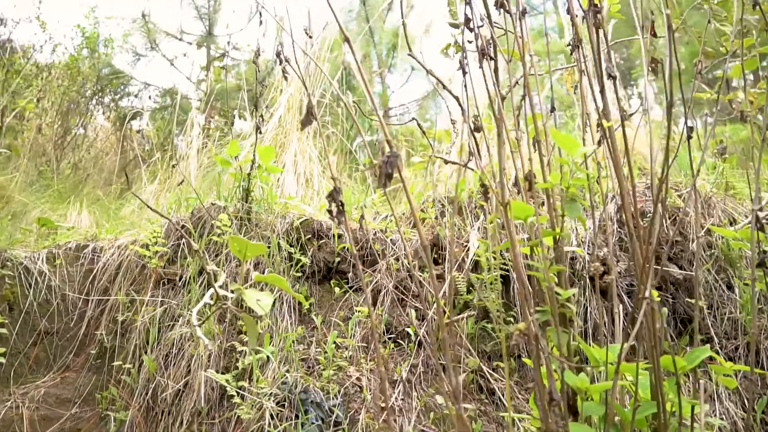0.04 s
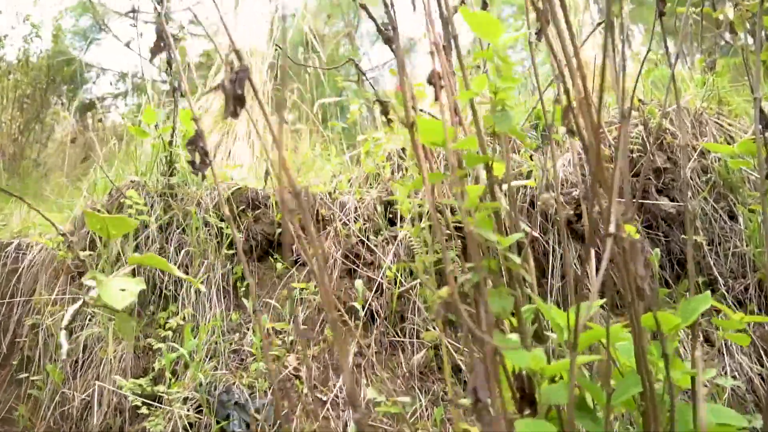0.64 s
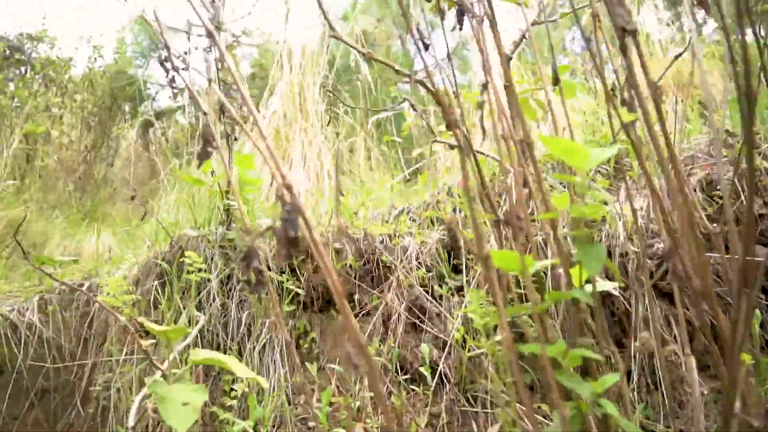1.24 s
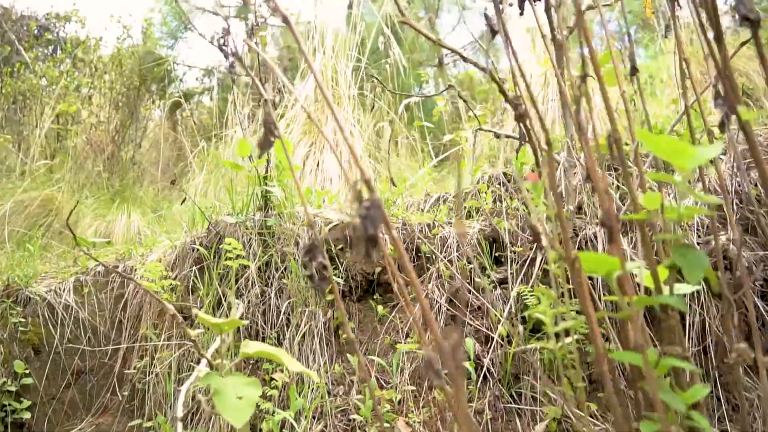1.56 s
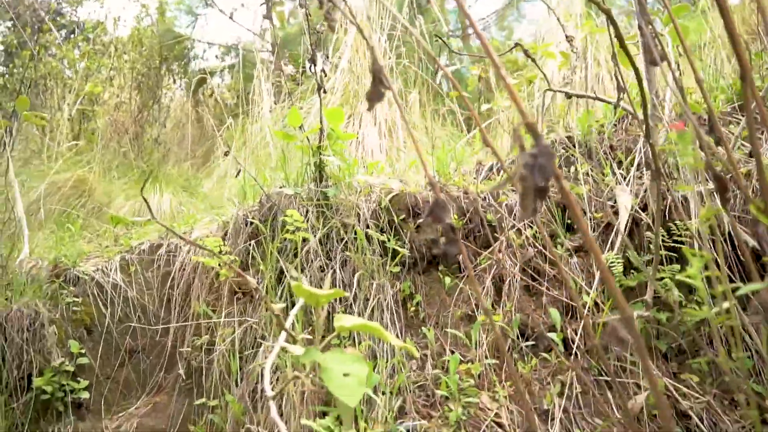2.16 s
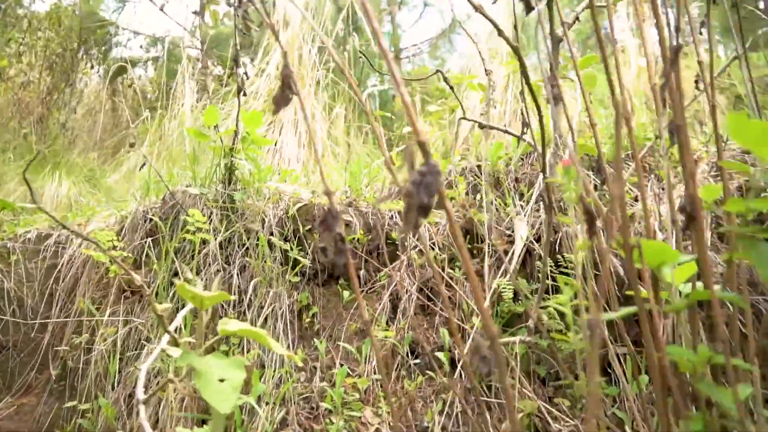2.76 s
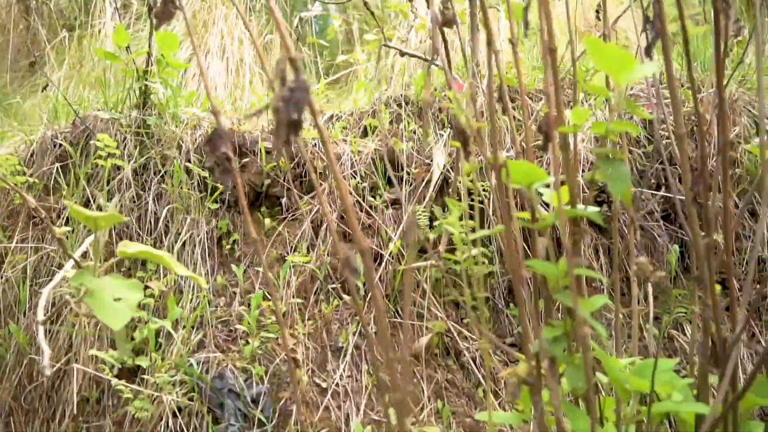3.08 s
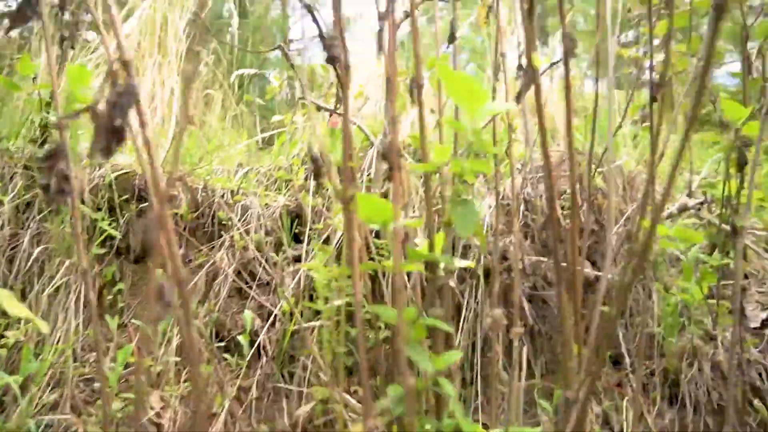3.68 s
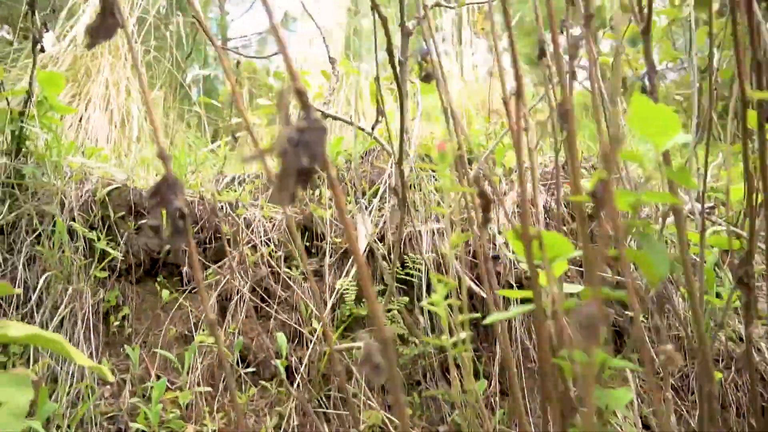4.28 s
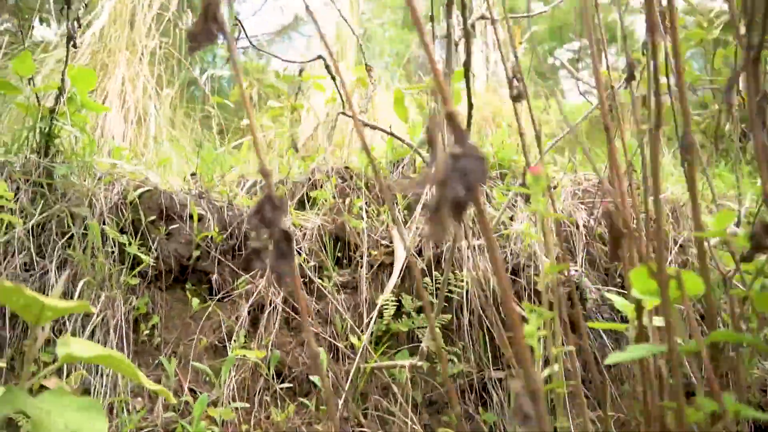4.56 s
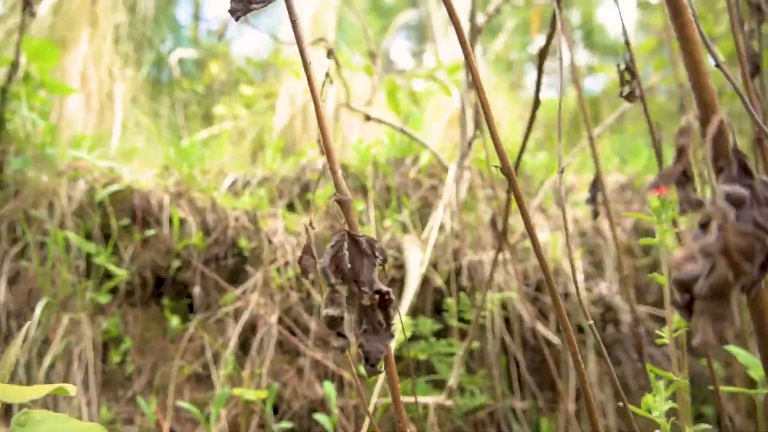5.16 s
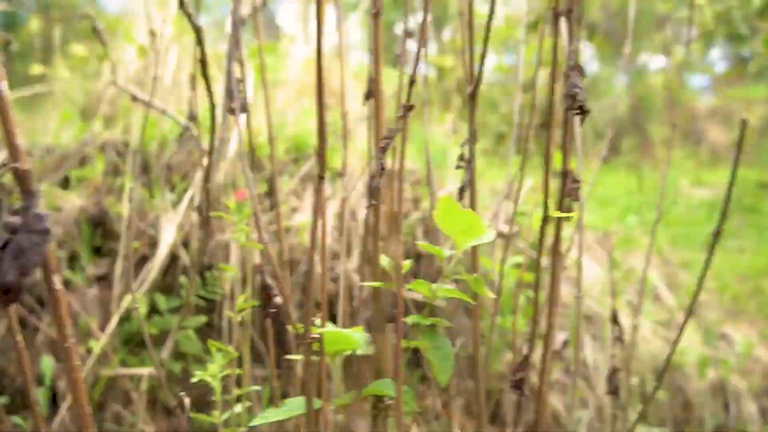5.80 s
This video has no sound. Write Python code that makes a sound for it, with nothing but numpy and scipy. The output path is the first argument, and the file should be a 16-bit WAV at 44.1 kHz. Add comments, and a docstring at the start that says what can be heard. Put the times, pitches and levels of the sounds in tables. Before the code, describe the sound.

Short rasps and harsh falling screeches from a scolding bird, with low microphone rumble and faint handling noise behind.

```python
"""Scolding bird on a wooded bank

Six harsh screeches clear and then fall, each led by one or two short rasps; one pair of rasps stands
alone. The two sides of the syrinx beat roughly at clashing pitches, coloured by the open beak; trunks
and leaves answer briefly. Behind it, air rumbles on a slow-moving microphone, a hand rubs and bumps
the camera, dry stalks tick, leaves rustle, two dull knocks sound and faint whistles come from far off."""
import sys
import numpy as np
from scipy import signal
from scipy.fft import rfft, irfft, next_fast_len
from scipy.io import wavfile
from scipy.ndimage import uniform_filter1d, map_coordinates

SR = 44100
rng = np.random.default_rng(int(sys.argv[2]) if len(sys.argv) > 2 else 0)


def store_pcm(level_fs):
    """Save levels as 16-bit WAV."""
    pcm = np.round(np.clip(level_fs, -1, 1) * 32767).astype(np.int16)
    wavfile.write(sys.argv[1], SR, np.atleast_2d(pcm).T)


N = 266011
TIME = np.arange(N) / SR

# Tone of the still wood, the air's slow sway, its faster buffet and the hand's rub: f/Hz, gain/dB
HUSH_EQ = [(150, -78), (250, -2.5), (324, -0.5), (658, -3), (930, -8), (1800, -11.5), (2100, -13),
           (3840, -15.5), (5240, -14), (6230, -15.5), (15600, -23)]
SWAY_EQ = [(3, -18.5), (6, -9), (11, 0), (16, 2.5), (22, -13.5), (30, -50), (60, -78), (120, -120)]
BUFFET_EQ = [(15, -16.5), (26, -1), (38, 0), (48, -11.5), (60, -16), (80, -28), (120, -12.5), (300, -60),
             (1000, -120)]
RUB_EQ = [(40, -24), (90, -2), (130, -1), (180, -3), (240, -10), (330, -11.5), (600, -23), (1200, -27.5),
          (3000, -63), (10000, -72)]
# Fader moves for the air on the microphone: t/s, sway/dB, buffet/dB
AIR_FADES = [(0.0, -21, -24.5), (0.28, -19, -41.5), (0.43, -14.5, -28), (0.5, -12.5, -36),
             (0.78, -26, -31.5), (1.03, -17, -38), (1.27, -25, -33.5), (1.5, -16.5, -42.5),
             (1.85, -29, -40), (2.07, -15, -32), (2.42, -14, -34), (2.52, -19.5, -27), (2.62, -6.5, -28),
             (2.69, -20, -37.5), (2.86, -14, -20.5), (3.14, -9, -36), (3.21, -26, -33), (3.44, -10.5, -37),
             (3.48, -20, -36.5), (4.16, -16.5, -38.5), (4.28, -38.5, -43.5), (4.33, -22.5, -41),
             (4.93, -8.5, -31), (5.1, -20.5, -40), (5.23, -8, -29), (5.33, -21.5, -43),
             (5.68, -21.5, -40.5), (5.75, -19, -25.5), (5.93, -23, -42), (6.0, -14, -29)]
# Fader moves for the rubbing hand: t/s, level/dB
RUB_FADES = [(0, -53.5), (.6, -60), (1.9, -62), (2.15, -53.5), (2.7, -56), (2.95, -48), (3.4, -59),
             (4.5, -61.5), (4.8, -55), (5.4, -60.5), (6, -55.5)]
# Soft bumps as the grip shifts: t/s, width/s, level/dB
GRIP_BUMPS = [(0.042, 0.0086, -40), (0.281, 0.031, -45.5), (1.142, 0.0078, -47.5), (1.251, 0.0063, -49),
              (2.075, 0.026, -49), (2.23, .01, -51.5), (2.337, 0.017, -45), (2.483, 0.0073, -46),
              (2.6, .01, -43.5), (2.834, 0.0085, -40.5), (2.917, 0.027, -42.5), (3.12, 0.014, -50),
              (3.554, .012, -53.5), (4.743, .01, -53), (4.82, 0.018, -41), (5.766, 0.011, -61)]
# Distant whistles: t/s, width/s, f/Hz, level/dB
FAR_WHISTLES = [(.02, 0.05784, 3324, -70), (3.024, 0.004, 1233, -61), (3.083, 0.0094, 2257, -64),
                (3.633, 0.034, 3319, -63), (3.76, 0.097, 3288, -73.5), (3.856, 0.012, 1305, -69),
                (5.919, 0.18, 1801, -74)]
# Leaf rustles and two short dull knocks: t/s, width/s, level/dB, centre f/Hz
RUSTLES_AND_KNOCKS = [(0.04, 0.0084, -57, 3180), (0.445, 0.065, -65, 5500), (0.65, 0.013, -64, 4850),
                      (2.19, 0.034, -60, 7552), (2.238, 0.012, -58.5, 8500), (2.326, 0.052, -63, 7740),
                      (2.343, 0.0016, -48, 696), (4.837, 0.025, -60.5, 1310), (4.831, 0.026, -60.5, 5000),
                      (4.903, 0.0029, -51, 1002)]
# Snapping stalks: t/s, relative level/dB, ring f/Hz, crack against ring/dB
STALK_SNAPS = [(0.2471, -46, 3280, -15), (0.3078, -46, 2950, -10), (0.335, -42.5, 2600, 3.5),
               (2.8841, -42.5, 2530, -10), (3.5463, -31, 3092, -19), (3.5612, -44, 2556, -7),
               (3.5965, -36, 2930, -14), (4.7099, -48, 2560, 5.5), (5.6956, -47, 2875, -15)]
# Reverb time among the trees: f/Hz, t60/s
WOOD_DECAY = [(300, 0.3), (5500, 0.47), (9000, 0.2088), (15000, 0.12)]
# Resonances of windpipe and beak (broad body, piercing throat, upper peak, sizzle): f/Hz, gain/dB
BODY_EQ = [(400, -31), (750, -14.5), (1080, 0), (1400, -7), (1950, -2.5), (2900, 1), (3900, 0),
           (5500, -0.5), (9000, -17), (12000, -52)]
THROAT_EQ = [(1000, -40), (2400, -19), (3200, -9.5), (4000, -3.5), (4550, 1.5), (5050, 5.5), (5600, 2),
             (6150, -10.5), (7300, -38), (9000, -31), (12000, -60)]
UPPER_EQ = [(1200, -24), (3300, -44), (5200, -6), (6200, -2.5), (7100, 3.5), (7900, -1), (8400, -6.5),
            (8900, -18.5), (9800, -27), (12000, -38)]
SIZZLE_EQ = [(6000, -12), (9000, 5), (10000, 2.5), (11500, -0.5), (13800, 3), (15500, -3), (18000, 4.5)]
# Short rasps: peak t/s, rise/s, level/dB, upper send/dB, sizzle send/dB, throat f/Hz, upper f/Hz
RASP_CUES = [(.813, 0.061, -37.5, -1.5, -22, 5070, 7300), (1.542, .019, -38.5, -1, -19.5, 4600, 6870),
             (2.414, .012, -35, -20, -30, 4606, 6803), (2.489, 0.022, -33, -13.5, -25, 4900, 7100),
             (3.147, .02, -39.5, -8, -18.5, 5058, 6670), (3.226, 0.048, -35.5, -2.5, -22, 5360, 7343),
             (3.945, .017, -37.5, -3.5, -25, 4740, 6000), (4.022, 0.04, -33.3, -1, -18, 5204, 6878),
             (4.421, .036, -43.5, -.7, -13, 4510, 7140), (4.499, .036, -38.5, -6, -20, 5200, 7030),
             (4.943, 0.024, -49.5, -12, -19, 4300, 6500), (5.017, 0.032, -44, -8, -21.5, 5430, 7263)]
# Long screeches: start t/s, end t/s, swell/s, swell depth/dB, fall/s, fall bend/exponent,
# level/dB, upper send/dB, sizzle send/dB, upper loss in the fall/dB,
# low side f/Hz, high side f/Hz, final low f/Hz, final high f/Hz, throat f/Hz, throat slide/share,
# upper f/Hz, time to clear/s, settled jitter/share, added jitter at the end/share
SCREECH_CUES = [(.874, 1.374, 0.0536, 4, 0.26, 1.63, -40.5, 1.2, -32, 5.5, 842, 920, 607.5, 661.3, 5030, 0.065, 7150, .07, 0.04, .25),
                (1.599, 1.883, 0.18, 2.5, 0.16, 1.2, -37.5, 1.5, -17, 9, 945.5, 1111, 608.8, 750, 4830, .01, 7370, .135, 0.02, .16),
                (2.536, 2.809, 0.11, 6.5, .14, 2.15, -34.5, -11, -27, 20, 936.8, 1052, 674.4, 681, 5020, 0.1, 7233, .12, 0.03, 0),
                (3.263, 3.494, 0.074, 7.5, .11, 1.34, -36, 1.5, -22.5, 21, 999.4, 1156, 744.6, 759.7, 5399, 0.033, 6680, 0.117, 0.03, 0),
                (4.065, 4.262, .025, 5.5, .1, 1.4, -37, -0.1, -17.5, 21, 938, 1104, 714.5, 810.5, 5130, 0.0067, 7115, 0.1149, 0.03, .1),
                (5.065, 5.229, 0.13, 10.5, 0.065, 1.76, -41.5, -8, -24, 21, 952, 1082, 818, 937, 5545, 0.27, 7640, 0.099, 0.04, 0.02)]


def amp(db):
    """Decibels to gain."""
    return 10 ** (np.asarray(db) / 20)


def unit(x):
    """Scale to rms 1."""
    return x / np.sqrt(np.mean(x ** 2) + 1e-20)


def along(points, hz):
    """Read (frequency, value) points on a log axis."""
    f, v = np.transpose(points)
    return np.interp(np.log(hz + 1), np.log(f + 1), v)


def curves(rows):
    """One automation curve for each column after the time."""
    times, *columns = np.transpose(rows)
    return [np.interp(TIME, times, column) for column in columns]


def filtered(x, response):
    """Equalise x with a gain given as a function of frequency."""
    size = next_fast_len(N + SR // 2)
    return irfft(rfft(x, size) * response(np.fft.rfftfreq(size, 1 / SR)), size)[:N]


def noise(eq):
    """Coloured noise of rms 1."""
    return unit(filtered(rng.standard_normal(N), lambda hz: amp(along(eq, hz))))


def wobble(rate):
    """Smooth random modulation, rate points a second."""
    return map_coordinates(rng.standard_normal(int(N * rate / SR) + 4), [TIME * rate])


def bell(s, width):
    """A bell-shaped fade in and out around the time s."""
    return np.exp(-.5 * ((TIME - s) / width) ** 2)


def hush(level_db=-61):
    """The bed: still woodland, gently drifting in level."""
    return amp(level_db + .7 * wobble(6)) * noise(HUSH_EQ)


def eddies(eq, level_db, cutoff_hz):
    """Low-passed rolls of air, evened out to a similar size."""
    air = noise(eq)
    rolls = unit(air / (np.abs(signal.hilbert(air)) + .5))
    return filtered(amp(level_db) * rolls, lambda hz: 1 / np.sqrt(1 + (hz / cutoff_hz) ** 10))


def air_rumble():
    """Air rolls over the microphone: a slow sway under a faster buffet."""
    sway_db, buffet_db = curves(AIR_FADES)
    return eddies(SWAY_EQ, sway_db + .52, cutoff_hz=25) + eddies(BUFFET_EQ, buffet_db + 1, cutoff_hz=80)


def handling():
    """The hand rubs unevenly on the camera body and bumps it as the grip shifts."""
    rub_db, = curves(RUB_FADES)
    rub = amp(rub_db - 1) * unit(amp(3 * wobble(35)))
    bumps = sum(amp(db) * bell(s, width) for s, width, db in GRIP_BUMPS)
    return np.hypot(rub, bumps) * noise(RUB_EQ)


def far_birds(waver=.00295):
    """Thin whistles, each slightly unsteady in pitch."""
    out = np.zeros(N)
    for s, width, hz, db in FAR_WHISTLES:
        phase = 2 * np.pi * np.cumsum(hz * (1 + waver * wobble(70))) / SR
        out += amp(db) * bell(s, width) * np.sqrt(2) * np.sin(phase)
    return out


def rustles_and_knocks(grain_db=3.5):
    """Grainy noise bursts: leaves rustle, and the two shortest, lowest bursts are dull knocks."""
    out = np.zeros(N)
    for s, width, db, hz in RUSTLES_AND_KNOCKS:
        band = noise([(hz / 8, -16), (hz, 0), (hz * 2.7, -17), (hz * 8, -40)])
        out += amp(db) * bell(s, width) * unit(band * amp(grain_db * wobble(600)))
    return out


def stalks(ring_t60=.015, crack_t60=.021, bandwidth=.69, trim_db=-5):
    """Dry stems snap with a crack and a short dull ring."""
    out, t = np.zeros(N + SR), np.arange(SR // 10) / SR
    for s, db, hz, crack_db in STALK_SNAPS:
        strike, crack = rng.standard_normal((2, len(t)))
        ring = unit(signal.lfilter(*signal.iirpeak(hz, 1 / bandwidth, SR), strike))
        snap = ring * amp(-60 * t / ring_t60) + crack * amp(crack_db - 60 * t / crack_t60)
        out[round(s * SR):][:len(t)] += amp(db + trim_db) * snap
    return out[:N]


def trees(x, ground_db=-12, trunks_db=-22):
    """A bounce off the ground, a scatter from near trunks, then a thin tail from the wood."""
    hz, t, bins = signal.stft(rng.standard_normal(SR // 2), SR, nperseg=256)
    decay_db = -60 * t / along(WOOD_DECAY, hz)[:, None]
    tone_db = along([(1000, -20), (5500, 6.5), (8000, 10.5), (14000, 0)], hz)[:, None]
    tail = signal.istft(bins * amp(decay_db + tone_db), SR, nperseg=256)[1]
    tail /= np.linalg.norm(tail)
    early = np.zeros(SR // 50)
    early[round(.0022 * SR)] += amp(ground_db)
    trunk_delays = rng.integers(SR // 300, SR // 50, size=6)
    early[trunk_delays] += amp(trunks_db) * rng.standard_normal(6) / np.sqrt(6)
    send_db = np.interp(TIME, [4.16, 4.46], [-19, -13])  # wetter, so the last calls sound further off
    return signal.fftconvolve(x, early)[:N] + signal.fftconvolve(x * amp(send_db), tail)[:N]


def closing(t, end, fall, bend):
    """How far the beak has closed, 0 to 1, over the last part of a screech."""
    return np.clip(1 - (end - t) / fall, 0, 1) ** bend


def effort(t, attack_db_per_s=1198, cut_db_per_s=2600, sag_db=2.5):
    """Power envelopes of the voice's main, upper and sizzle bands at the times t."""
    power = np.zeros((3, len(t)))
    # A screech catches, swells, holds, then dulls as the beak closes and is cut off.
    for start, end, swell_s, swell_db, fall, bend, db, upper_db, sizzle_db, dull_db, *_ in SCREECH_CUES:
        shut = closing(t, end, fall, bend)
        gate_db = attack_db_per_s * np.maximum(0, start - t) + cut_db_per_s * np.maximum(0, t - end)
        soft_db = swell_db * np.clip(1 - (t - start) / swell_s, 0, 1) ** 2 + sag_db * shut
        bands_db = np.array([0 * t, upper_db - dull_db * shut ** 2.88, sizzle_db - 8 * shut])
        power += amp(db - gate_db - soft_db + bands_db) ** 2
    # A rasp catches at once, builds and is released fast; the treble comes with the pressure.
    rise_db_per_s, release_db_per_s, hold_s = 300, 1700, .0028
    for s, rise_s, db, upper_db, sizzle_db, *_ in RASP_CUES:
        gate_db = attack_db_per_s * np.maximum(0, s - rise_s - t)
        soft_db = rise_db_per_s * np.maximum(0, s - t) + release_db_per_s * np.maximum(0, t - s - hold_s)
        bands_db = np.array([-soft_db, upper_db - 1.42 * soft_db, sizzle_db - soft_db])
        power += amp(db - gate_db + bands_db) ** 2
    return power


def posture(rasp_pitches_hz=(800, 950), rasp_jitter=.28, onset_jitter=.269, fray_s=.0282, upper_slide=.11):
    """Pitch, jitter and resonance curves: held in a rasp; a screech clears, then sinks."""
    rows = []
    for cue in SCREECH_CUES:
        start, end, _, _, fall, bend = cue[:6]
        low_hz, high_hz, low_end_hz, high_end_hz = cue[10:14]
        throat_hz, throat_slide, upper_hz, clear_s, settled, fray = cue[14:]
        t = np.linspace(start, end, 60)
        shut = closing(t, end, fall, bend)
        clearing = np.interp(t - start, [0, clear_s], [onset_jitter, settled])
        jitter = clearing + fray * np.exp((t - end) / fray_s)
        low = low_hz + (low_end_hz - low_hz) * shut
        high = high_hz + (high_end_hz - high_hz) * shut
        throat = throat_hz * (1 - throat_slide * shut ** 2)
        upper = upper_hz * (1 - upper_slide * shut ** 2)
        rows += zip(t, low, high, jitter, throat, upper)
    for s, rise_s, *_, throat_hz, upper_hz in RASP_CUES:
        for edge in (s - rise_s, s + .015):
            rows.append((edge, *rasp_pitches_hz, rasp_jitter, throat_hz, upper_hz))
    return curves(sorted(rows))


def syrinx(centre_hz, jitter, quaver=.01):
    """One side's sharp pulse per beat; each period errs by itself, so high harmonics blur first."""
    pitch_hz = centre_hz * (1 + quaver * wobble(90))
    cycles = np.cumsum(pitch_hz) / SR
    beat_s = np.interp(np.arange(1, int(cycles[-1])), cycles, TIME)
    spread = np.interp(beat_s, TIME, jitter)
    period = 1 / np.interp(beat_s, TIME, pitch_hz)
    timing_error, size_error = rng.standard_normal((len(beat_s), 2)).T
    drift = np.cumsum(timing_error * spread * period)
    drift -= uniform_filter1d(drift, size=60)  # rough, yet still on pitch
    centres = np.clip((beat_s + drift) * SR, 8, N - 9)
    taps = centres.astype(int)[:, None] + np.arange(-7, 9)
    offset = taps - centres[:, None]
    click = np.sinc(offset) * np.cos(np.pi * offset / 16) ** 2  # band-limited, placed between samples
    sizes = amp(4 * np.sqrt(spread) * size_error) * np.sqrt(period)
    return unit(np.bincount(taps.ravel(), (click * sizes[:, None]).ravel(), N))


def beak(source, throat_hz, upper_hz, throat_eq_peak_hz=5050, upper_eq_peak_hz=7100):
    """Windpipe and beak shape the source into calls; the high resonances sink as the beak closes."""
    hz, t, bins = signal.stft(source, SR, nperseg=256, noverlap=192)
    throat_shift = np.interp(t, TIME, throat_hz) / throat_eq_peak_hz
    upper_shift = np.interp(t, TIME, upper_hz) / upper_eq_peak_hz
    main, upper, sizzle = effort(t)
    # A soft voice stays in the windpipe's broad body; a forced one gathers in the piercing resonance.
    force_db = 10 * np.log10(main + 1e-12) + 36
    body_share = np.clip(amp(-11.5 - .8 * force_db) ** 2, 0, .5)
    resonances = [(BODY_EQ, 1, main * body_share),
                  (THROAT_EQ, throat_shift, main * (1 - body_share) * amp(-1) ** 2),
                  (UPPER_EQ, upper_shift, upper),
                  (SIZZLE_EQ, upper_shift, sizzle * amp(2.5) ** 2)]
    colour = 0
    for eq, shift, power in resonances:
        shape = amp(along(eq, hz[:, None] / shift)) ** 2
        colour += power * shape / shape.mean(axis=0)
    return signal.istft(bins * np.sqrt(colour), SR, nperseg=256, noverlap=192)[1][:N]


def bird(high_side_db=-1.5, breath=.21, low_cut_hz=1200, flutter_db=.9):
    """The lead: two clashing pulse trains and a little breath, voiced through the beak."""
    low_hz, high_hz, jitter, throat_hz, upper_hz = posture()
    clash = syrinx(low_hz, jitter) + amp(high_side_db) * syrinx(high_hz, jitter)
    # The small beak radiates the fundamentals poorly.
    pulses = filtered(clash, lambda hz: hz ** 3 / np.sqrt(hz ** 6 + low_cut_hz ** 6))
    source = unit(pulses + breath * rng.standard_normal(N))
    return beak(source, throat_hz, upper_hz) * amp(flutter_db * wobble(140))


def scene():
    """Bird and undergrowth among the trees, over the rumble and the hush of the wood, in mono."""
    near = bird() + stalks() + rustles_and_knocks()
    return (near + trees(near) + far_birds() + handling() + air_rumble() + hush())[None]


def record(dry, top_hz=15780):
    """A brick-wall high cut takes off the very top."""
    return filtered(dry[0], lambda hz: hz < top_hz)[None]


dry = scene()
out = record(dry)
store_pcm(out)
```